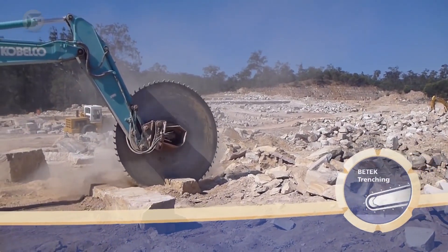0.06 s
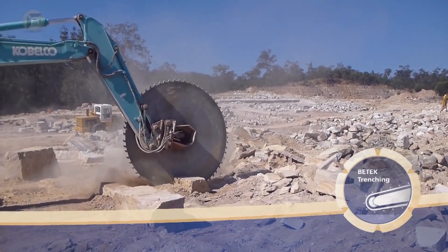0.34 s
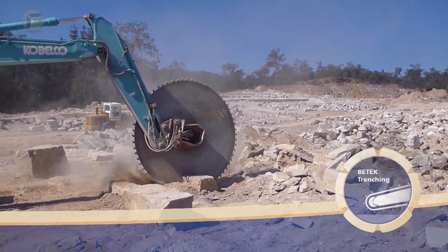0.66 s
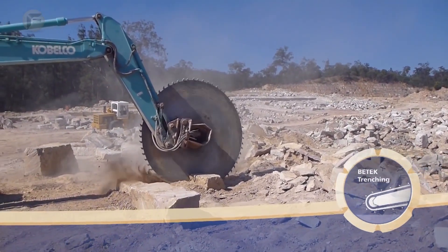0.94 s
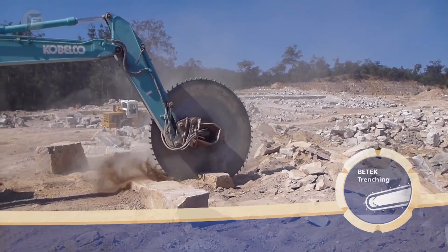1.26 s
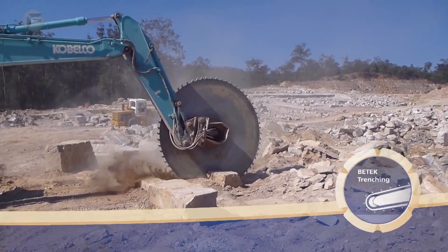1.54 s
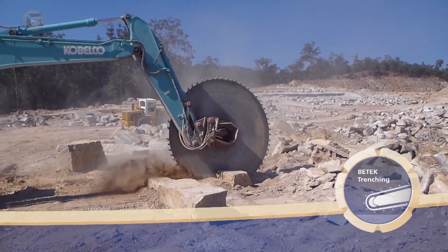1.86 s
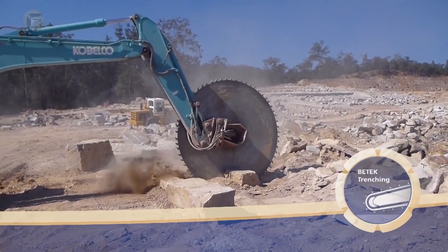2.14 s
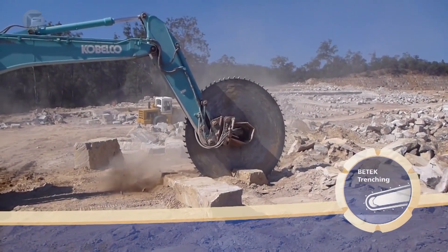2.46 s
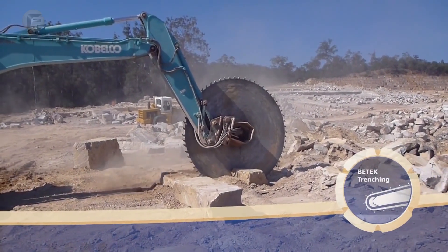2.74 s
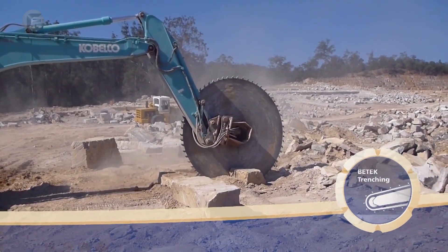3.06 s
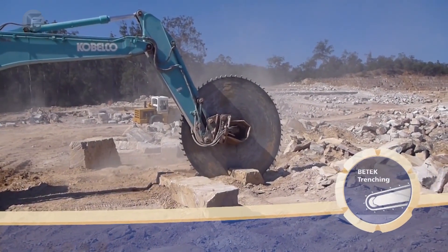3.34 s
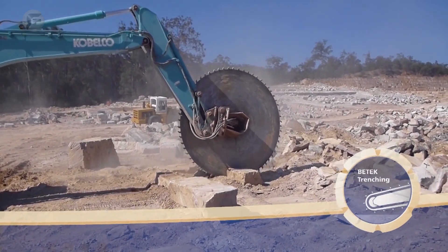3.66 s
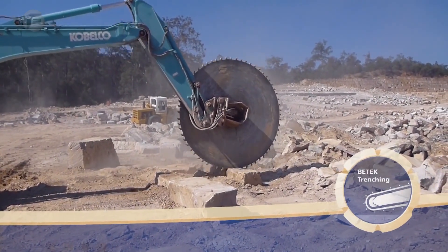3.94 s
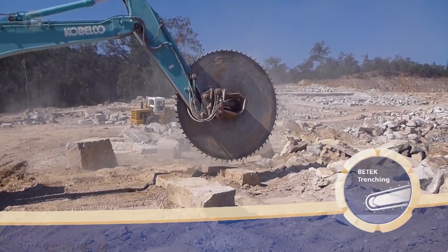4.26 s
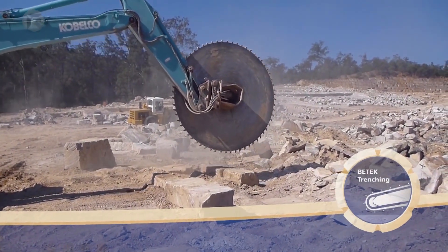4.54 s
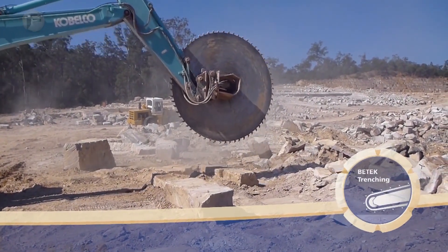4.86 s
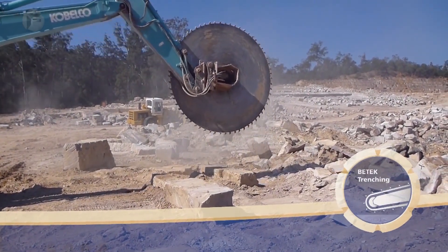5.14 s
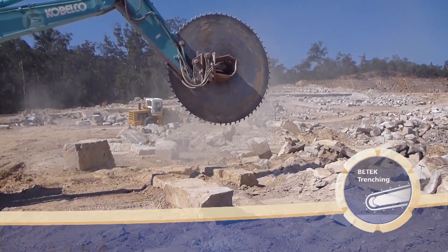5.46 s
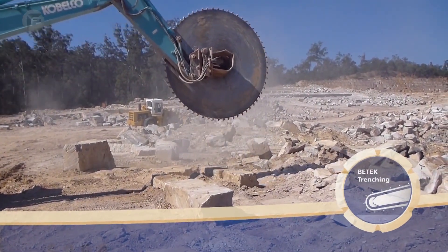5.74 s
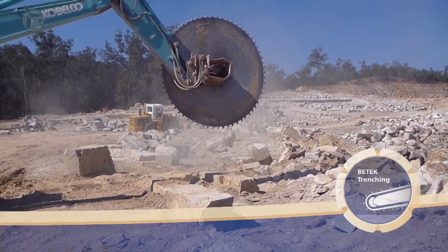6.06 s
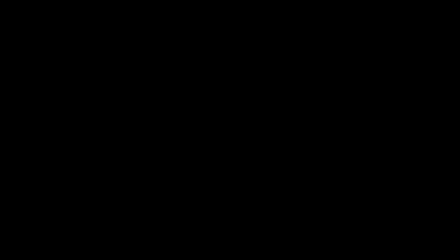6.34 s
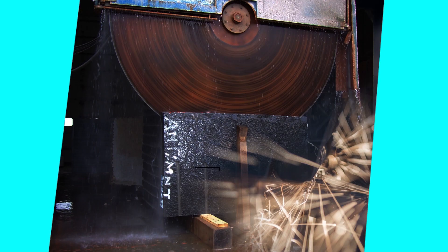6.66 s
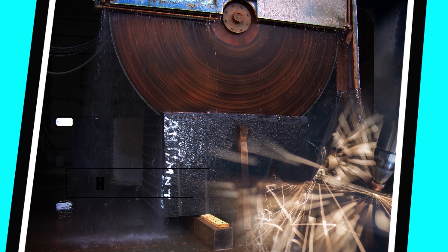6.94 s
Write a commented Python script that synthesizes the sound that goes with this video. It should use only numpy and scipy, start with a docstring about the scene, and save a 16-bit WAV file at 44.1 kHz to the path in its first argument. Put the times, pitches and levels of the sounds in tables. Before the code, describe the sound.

Outdoors in a quarry, a big steel saw wheel crunches through rock, surging as chunks crack off and grit sprays. The grinding soon stops, leaving the excavator's softer diesel clatter and a gently gliding hydraulic whine, while puffs of wind bump the microphone over a low rumble. The machine fades out, and after a short silence comes a brief, faint rush of another saw.

```python
"""An excavator's toothed saw wheel grinds through a stone block in an open quarry, then lifts clear.
Its picks break the stone by brittle fracture, and the cracks excite the resonances of the steel disc.
The diesel and its hydraulic pump remain: they share a shaft, so exhaust note and whine glide together.
Turbulent wind rumbles and thuds on the microphone. The quarry fades out, and after a short silence
the wash of another saw starts at the very end."""
import sys
import numpy as np
from scipy import signal
from scipy.fft import rfft, irfft
from scipy.io import wavfile

SR = 44100
rng = np.random.default_rng(int(sys.argv[2]) if len(sys.argv) > 2 else 0)


def master(y):
    """Save y as 16-bit WAV."""
    cut = np.clip(np.atleast_2d(y).T, -1, 1)
    pcm = np.round(cut * 32767)  # scale
    wavfile.write(sys.argv[1], SR, pcm.astype(np.int16))


N = 309141
T = np.arange(N) / SR
HZ = np.fft.rfftfreq(N, 1 / SR)
EXIT_S, LIFT_S = 2.172, (2.65, 3.87)  # the wheel leaves the block; the boom lifts (from, to)


def amp(db):
    """Decibels as an amplitude ratio."""
    return 10 ** (np.asarray(db) / 20)


def unit(x):
    """Normalisation to rms 1."""
    return x / np.sqrt(np.mean(x ** 2) + 1e-20)


def curve(rows):
    """Linear interpolation of (time_s, value) rows to one value per sample."""
    return np.interp(T, *np.transpose(rows))


def ramp(times, start, end):
    """Linear change between two times."""
    return np.interp(T, times, [start, end])


def swell(s, length):
    """Gaussian envelope centred on the time s."""
    return np.exp(-(2 * (T - s) / length) ** 2)


def shape(points):
    """Spectral envelope: (frequency_hz, level_db) rows as a gain per frequency."""
    hz, db = np.transpose(points)
    return amp(np.interp(np.log(HZ + 1), np.log(hz + 1), db))


def colour(x, gain):
    """Filtering by multiplication of the spectrum."""
    return irfft(rfft(x) * gain, N)


def noise(gain):
    """Filtered Gaussian noise of rms 1."""
    return unit(colour(rng.standard_normal(N), gain))


def band_rms(x, low_hz, high_hz):
    """The rms of x inside one band."""
    return np.std(colour(x, (HZ > low_hz) & (HZ < high_hz))) + 1e-12


def wander(rate_hz):
    """Random modulation: low-pass noise of rms 1."""
    return noise(1 / (1 + (HZ / rate_hz) ** 4))


def grains(per_s, spread_db):
    """Shot noise: random clicks, most small and a few large."""
    size = amp(spread_db * np.minimum(rng.exponential(1, N), 4.5)) * rng.choice([-1, 1], N)
    return unit(size * (rng.random(N) < per_s / SR))


def resonances(rows):
    """Lorentzian peaks added in power to a flat response."""
    return np.sqrt(1 + sum(amp(db) ** 2 / (1 + (2 * (HZ - hz) / width) ** 2) for hz, width, db in rows))


def noise_bands(rows):
    """Band-limited noise bursts: the narrower the band, the clearer the pitch."""
    return sum(amp(db) * swell(s, length) * noise(1 / (1 + (2 * (HZ - hz) / width) ** 4))
               for s, length, hz, width, db in rows)


# steady pressure of the wheel on the stone: time_s, level_db
WHEEL_FEED = [(0, -30.5), (.75, -29.5), (1.03, -30.5), (1.2, -30.5), (1.5, -32), (1.7, -30.5), (1.765, -35),
              (1.82, -31), (1.95, -31), (2.045, -33.5), (2.1, -33.5), (2.135, -35), (2.2, -35.5)]
# a chunk cracks off and the picks bite deeper: start_s, length_s, rise_db, bass_db, crack_db
DEEP_BITES = [(0.031, 0.041, 3, 0.5, -18.5), (0.173, 0.025, 3.5, 1, -19), (0.338, 0.018, 7, 1, -15.5),
              (0.44, 0.079, 1, 1.5, -19.5), (0.556, 0.088, 2, 1, -16), (0.664, 0.04, 2.5, -1, -27.5),
              (0.778, 0.046, 2.5, 0, -19.5), (0.836, 0.022, 3, -0.5, -13.5), (.866, 0.032, 4, 1, -21),
              (0.946, 0.037, 3.5, -3.5, -24), (1.068, 0.061, 4.5, -1.5, -17), (1.276, 0.027, 4, 0.5, -25),
              (1.351, 0.068, 4, 0, -13), (1.543, 0.12, 0.5, 1.5, -20), (1.608, 0.075, 4, 3.5, -30.5),
              (1.663, 0.011, -2, -4.5, -15), (1.788, 0.043, 2.5, 0.5, -13), (1.847, 0.019, 2, 2.5, -17),
              (1.984, 0.015, 1, 1, -18), (2.078, 0.029, 1, 2.5, -34), (2.157, 0.015, -0.5, 5, -18)]
# fine grit spurts or thins: centre_s, length_s, change_db
GRIT_SPURTS = [(0.133, .05, -4.5), (.45, .1, -2), (0.898, .15, 2), (1.215, 0.053, 5), (1.33, 0.063, -5),
               (1.42, 0.11, 2), (1.515, .04, 2.5), (1.587, 0.045, -2.5), (1.95, 0.19, 2), (2.305, .04, 5),
               (2.41, .06, 4)]
def cut_levels(attack_s=0.047, release_s=0.015, exit_db_per_s=39, dust_end_s=1.68, dust_db_per_s=10):
    """Envelopes in dB of the cut, its bass and its grit: a surge at each bite, then exponential decay."""
    surge, bass = np.zeros(N), np.zeros(N)
    for s, length, rise_db, bass_db, _ in DEEP_BITES:
        attack = np.clip((T - s) / attack_s + .5, 0, 1)
        held = attack * np.exp(-np.maximum(T - s - length, 0) / release_s)
        surge += rise_db * held
        bass += bass_db * held
    cut = curve(WHEEL_FEED) + surge - exit_db_per_s * np.maximum(T - EXIT_S, 0)
    thinning = dust_db_per_s * np.maximum(T - dust_end_s, 0)  # the sound dulls as the grit runs out
    spurts = sum(db * swell(s, length) for s, length, db in GRIT_SPURTS)
    return cut, bass + 0.58 * thinning, spurts - 0.48 * surge - thinning


def scatter(x, share=0.12, ring_s=0.012):
    """Scattering from nearby rubble gives each crack a short diffuse tail."""
    decay = np.exp(-2 * np.arange(SR // 10) / SR / ring_s)
    power = abs(signal.fftconvolve(x ** 2, decay / decay.sum())[:N])
    return np.sqrt(1 - share) * x + np.sqrt(share * power) * rng.standard_normal(N)


# resonances of the steel disc: pitch_hz, width_hz, gain_db
DISC_MODES = [(132.6, 6.1, 2.5), (313.7, 10, 15), (365, 16, 5), (429.5, 7.9, 14.5), (495.6, 23, 15),
              (566.5, 18, 9.5), (724.5, 24, 7.5), (817, 20, 7), (903, 22, 1.5), (980, 11, 6),
              (1140, 66, 0.5), (1250, 25, -1), (1400, 26, -9), (1750, 35, 2), (2190, 55, -1),
              (2399, 40, -2.5), (2580, 120, -1), (2730, 70, 5.5), (3018, 70, 4), (3126, 55, 5),
              (3290, 60, 0.5), (3450, 55, 3.5), (3608, 60, 7), (3955, 73, 8), (4210, 120, 2), (4480, 63, 1),
              (4970, 78, -2), (5670, 80, -5), (6200, 99, -7), (7360, 60, -6.5)]
def disc_response(depth_db=5.5, crowded_hz=1500, spacing_hz=28):
    """Modal response of the disc: distinct peaks, and a random ripple where high modes crowd."""
    grid = np.arange(0, SR / 2, spacing_hz)
    ripple = np.interp(HZ, grid, rng.uniform(-0.97, 1, len(grid)))
    return resonances(DISC_MODES) * amp(depth_db * ripple * HZ ** 2 / (HZ ** 2 + crowded_hz ** 2))


# spectrum of breaking stone: frequency_hz, level_db
STONE_SPECTRUM = [(25, -21.5), (55, -6), (200, -5.5), (350, -9), (600, -4.5), (1100, -2), (1500, -3),
                  (1950, -10), (2500, -3.5), (3300, -2.5), (3790, -7), (4300, -8.5), (4800, -12),
                  (7300, -16), (10500, -23), (14800, -39)]
def grinding(pick_hz=51, pick_depth=0.11):
    """Brittle fracture: each pick bursts the stone into a shower of cracks that rings the disc."""
    cut_db, bass_db, grit_db = cut_levels()
    picks = np.cumsum(pick_hz * (1 + 0.41 * wander(30))) / SR
    force = rng.uniform(0, 0.53, N)[picks.astype(int)]
    blows = 1 + pick_depth * force * np.exp(-(picks % 1) / .25)
    cracks = 0.5 * grains(3000, spread_db=1.5) + 0.5 * rng.standard_normal(N)
    drive = scatter(cracks * blows * amp(wander(78)))
    stone = colour(drive, shape(STONE_SPECTRUM) * disc_response())
    # heavy chunks boom in the low band, crushed dust fizzes in the high one
    low, high = 1 / (1 + (HZ / 1550) ** 8), 1 / (1 + (5000 / (HZ + 1)) ** 8)
    middle = colour(stone, 1 - low - high) / band_rms(stone, 1800, 5300)
    bass = colour(stone, low) / band_rms(stone, 310, 2400) * amp(bass_db - 1.72 + wander(45))
    grit = colour(stone, high) / band_rms(stone, 4940, 12000) * amp(grit_db - 7.5 + 0.27 * wander(50))
    return (bass + middle + grit) * amp(cut_db + 0.16 + 0.68 * wander(8.1))


# the pump's hum, strong in the cut and again as the boom lifts: time_s, level_db
HUM_LEVEL = [(0, -37), (.13, -34.5), (.28, -38.5), (.45, -32.5), (.65, -39), (1.2, -46), (2.4, -55),
             (3.42, -55.5), (3.52, -40), (3.61, -37.5), (3.67, -41.5), (3.94, -34.5), (4.04, -42.5),
             (4.11, -36), (4.22, -41.5), (4.35, -30), (4.51, -42), (4.75, -44.5), (4.88, -33.5),
             (5.13, -36), (5.19, -40), (5.32, -34), (5.52, -34.5), (5.68, -37.5), (5.78, -48), (6, -38.5)]
def pump_hum(strokes, throb_depth=0.19):
    """The second harmonic of the piston rate, amplitude-modulated by the engine's two-turn cycle."""
    level = amp(curve(HUM_LEVEL) + 0.5 * wander(13))
    throb = 1 + throb_depth * np.sin(2 * np.pi * strokes / 18 + wander(6.7))
    jolts = ramp((EXIT_S, LIFT_S[0]), 0.5115, 0) * wander(23)  # the picks shake the phase as they cut
    return level * throb * np.sin(2 * np.pi * 2 * strokes + 0.22 * wander(70) + jolts)


# oil flow to the boom: time_s, level_db
OIL_FLOW = [(2.6, -54), (3.05, -60), (3.15, -54), (3.45, -52), (3.57, -48), (4.0, -53.5), (4.15, -51),
            (4.55, -54.5), (4.82, -50), (5.7, -51.5)]
# main partials of the whine: harmonic, level_db
WHINE_PARTIALS = [(4, -3.5), (5, -11.5)]
# its other partials: harmonic, level_db
WHINE_OVERTONES = [(3, -9), (6, -14.5), (7, -13), (8, -11), (9, -14), (10, -14.5), (11, -20), (12, -15),
                   (13, -14), (14, -12), (15, -12), (16, -16), (17, -19), (18, -20.5), (19, -21)]
# resonances of the steel boom: pitch_hz, width_hz, gain_db
BOOM_MODES = [(1284, 98, 11), (1870, 35, 5.5), (2250, 54, 8.5), (2570, 45, 4.5), (3100, 70, 7.5)]
# single partials flare briefly: centre_s, length_s, harmonic, level_db
WHINE_FLARES = [(3.2, .3, 15, -59), (3.31, .25, 12, -58), (3.3, .45, 4, -53), (3.57, .1, 13, -55),
                (3.58, .12, 12, -54), (3.76, .22, 3, -51), (3.82, .2, 8, -60), (3.84, .16, 12, -58),
                (3.8, .2, 16, -63), (4.12, .14, 4, -53), (4.28, .25, 8, -60), (4.62, .3, 15, -64),
                (4.83, .26, 12, -54), (4.9, .2, 16, -63), (4.9, .22, 17, -67), (4.9, .25, 6, -58),
                (4.88, .2, 13, -61), (5.39, .45, 4, -46.5), (5.5, .45, 7, -56), (5.35, .22, 16, -58),
                (5.37, .28, 17, -61), (5.33, .2, 13, -62), (5.33, .25, 18, -66), (5.55, .15, 15, -60),
                (5.98, .3, 8, -61), (6.1, .2, 18, -66)]
def pump_whine(strokes, piston_hz, relax_s=(5.66, 5.78), waver_db=1.5):
    """Forced vibration: the boom's resonances lift each piston harmonic that glides through them."""
    pressure = ramp(relax_s, 0.96, 0.25)  # the valve eases off
    drive = amp(curve(OIL_FLOW)) * ramp(LIFT_S, 0.28, 0.96) * pressure
    steel = resonances(BOOM_MODES)
    partials = list(WHINE_PARTIALS) + [(k, db + 0.5) for k, db in WHINE_OVERTONES]
    sizes = {k: drive * amp(db) * np.interp(k * piston_hz, HZ, steel) for k, db in partials}
    for s, length, k, db in WHINE_FLARES:
        sizes[k] = np.hypot(sizes[k], amp(db) * swell(s, length))
    jitter = 0.2 * wander(16) + 0.12 * wander(70)
    return sum(size * amp(waver_db * wander(16))
               * np.sin(2 * np.pi * (k * strokes + rng.random()) + jitter) for k, size in sizes.items())


# load on the engine: time_s, level_db
ENGINE_LOAD = [(0, -14), (2.4, -10), (3.3, -7), (3.7, -4.5), (4.55, -5.5), (5.1, -0.2), (5.6, 0.5)]
# partials of the exhaust note: shaft_multiple, level_db
EXHAUST_ORDERS = [(3, 1), (4.5, -8.5), (6, -25), (7, -12), (9, -9.5), (10, -10.5), (16, -12)]
# spectrum of the engine's clatter: frequency_hz, level_db
CLATTER_SPECTRUM = [(210, -45.5), (350, -10.5), (419, -15), (525, -2.5), (657, -16.5), (830, -11),
                    (1190, -20), (1320, -14.5), (3000, -34.5), (3900, -63.5), (6600, -120)]
def diesel(turns, firing):
    """Periodic combustion: a low exhaust note and pulsing clatter, both growing with the load."""
    load_db = curve(ENGINE_LOAD)
    exhaust = sum(amp(db + 1.1 * wander(8.3)) * np.sin(2 * np.pi * (k * turns + rng.random()))
                  for k, db in EXHAUST_ORDERS)
    clatter = colour(grains(4000, spread_db=1) * firing, shape(CLATTER_SPECTRUM))
    clatter *= amp(0.75 * load_db - 46.5) / band_rms(clatter, 585, 950)
    return exhaust * amp(load_db - 34) + clatter


# spectrum of flowing oil: frequency_hz, level_db
OIL_SPECTRUM = [(1060, -34), (1570, -10.5), (1730, -10.5), (1840, 1), (1950, -8), (2100, -8), (2650, -6),
                (2860, -12), (3030, -3), (3210, -5), (4130, -12), (5500, -20), (5930, -20), (9500, -31),
                (10500, -29.5), (13400, -42.5)]
def oil_hiss(firing):
    """Flow noise: the hiss follows the oil flow and pulses slightly with each firing."""
    hiss = colour(rng.standard_normal(N) * firing, shape(OIL_SPECTRUM))
    return hiss * amp(curve(OIL_FLOW) - 1) / band_rms(hiss, 1800, 3800)


# strength of the rumble: time_s, level_db
RUMBLE_LEVEL = [(0, -42.5), (.25, -38.5), (.7, -44), (1.5, -40.5), (2.9, -42), (3.12, -41.5), (3.35, -37),
                (3.85, -40.5), (4.42, -34.5), (4.56, -41), (5, -40.5), (5.2, -35), (5.6, -40)]
# its spectrum: frequency_hz, level_db
RUMBLE_SPECTRUM = [(20, -40), (35, -20), (55, -3), (90, -2), (140, 1), (220, 0), (310, -6), (400, -14),
                   (700, -23), (1500, -65)]
def rumble(lumpy_db=1.45):
    """Random pressure fluctuations of wind and machine make a low, lumpy rumble."""
    lumps = unit(colour(grains(2000, spread_db=2), shape(RUMBLE_SPECTRUM)))
    return lumps * amp(curve(RUMBLE_LEVEL) + 1.5 + lumpy_db * wander(38))


def crunches(attack_s=0.0006, decay_s=0.0037):
    """Sudden stress release: at each bite a chunk gives way with a short dull crack."""
    t, hits = np.arange(SR // 20) / SR, np.zeros(N)
    burst = (1 - np.exp(-t / attack_s)) * np.exp(-t / decay_s)
    for s, *_, db in DEEP_BITES:
        hits[round(s * SR) + np.arange(len(t))] += amp(db - 5) * burst
    chunk = [(150, -19.5), (400, -4.5), (900, 3), (1400, -1.5), (2000, -14), (3300, -10),
             (6000, -28), (13000, -52.5)]  # frequency_hz, level_db
    return hits * noise(shape(chunk))


def pings(per_mode_per_s=9, ring_s=0.014, lowest_hz=2000):
    """Impulse response: hard grains strike the rim and ring single high modes of the disc."""
    t, rings = np.arange(SR // 12) / SR, np.zeros(N)
    for hz, _, db in DISC_MODES:
        if hz > lowest_hz:
            mode = np.exp(-t / ring_s) * np.sin(2 * np.pi * hz * t)
            rings += amp(db) * signal.fftconvolve(grains(per_mode_per_s, spread_db=1.5), mode)[:N]
    return unit(rings) * amp(cut_levels()[0] - 11)


# picks that skid: centre_s, length_s, pitch_hz, width_hz, level_db
PICK_SKIDS = [(0.175, 0.02, 7000, 1398, -35.5), (.25, 0.041, 10870, 1097, -48),
              (.352, .028, 3000, 1400, -27.5), (.885, .012, 3400, 1500, -26.5),
              (.38, .07, 10400, 401.6, -45), (0.457, 0.11, 510, 24.74, -31), (0.629, .05, 5660, 398, -46),
              (.874, 0.022, 722, 250, -25.5), (1.296, 0.036, 3700, 700, -30),
              (1.815, 0.035, 9000, 5000, -38.5), (2.16, 0.05, 800, 69.7, -34),
              (2.195, .04, 3300, 1000, -38), (2.38, .08, 3300, 1010, -45.5),
              (2.535, .05, 3200, 1200, -47.5), (2.615, 0.035, 3400, 1000, -53), (2.56, .1, 11700, 200, -75),
              (2.815, 0.05, 6200, 500, -64)]
def skids():
    """Friction: a skidding pick rings briefly in one band."""
    return noise_bands(PICK_SKIDS)


# puffs on the microphone: start_s, level_db, pitch_hz, ring_s
WIND_PUFFS = [(1.102, -22, 151, 0.01), (1.751, -20.5, 138, 0.0045), (1.998, -25.5, 98, 0.014),
              (2.329, -26, 110, 0.0073), (2.437, -26, 96, 0.01), (2.757, -20.5, 230, 0.0031),
              (2.7616, -22, 420, 0.0033), (2.783, -24, 136, 0.008), (2.799, -27, 260, 0.005),
              (2.812, -28, 130, .005), (2.839, -25, 150, 0.0056), (3.018, -21.5, 115, 0.0071),
              (3.028, -16.5, 200, 0.0031), (3.045, -26, 157, .006), (3.16, -19.5, 167, 0.0071),
              (3.249, -22.5, 210, 0.0044), (3.267, -22.5, 170, 0.0045), (3.321, -25, 120, 0.008),
              (3.36, -20.5, 128, 0.0057), (3.392, -25.5, 200, .005), (3.451, -23, 106, 0.009),
              (3.512, -22, 220, .004), (3.537, -24, 190, 0.0042), (3.6, -22, 120, 0.0057),
              (3.688, -20.5, 120, 0.0048), (3.782, -25, 200, 0.0035), (3.921, -21.5, 231, 0.0057),
              (3.938, -21, 150, 0.006), (4.064, -21.5, 227, 0.0048), (4.089, -21.5, 110, 0.0079),
              (4.127, -23, 150, 0.0065), (4.142, -17, 165, 0.0042), (4.212, -25, 190, 0.004),
              (4.281, -25, 150, 0.0052), (4.307, -24, 214, 0.0038), (4.346, -23, 150.1, 0.0095),
              (4.413, -21, 175, 0.0065), (4.428, -20, 190, 0.0031), (4.438, -25, 280, .004),
              (4.474, -15, 130, 0.0078), (4.482, -19, 121, 0.004), (5.131, -27, 89.7, 0.0058),
              (5.173, -19.5, 99.3, 0.0053)]
def wind_thuds(slap=0.6, rush=0.13, rush_hz=620, band_hz=(72, 3000)):
    """Damped oscillation: each puff slaps the microphone's diaphragm and lets it swing."""
    air = noise(1 / (1 + (HZ / rush_hz) ** 4) * HZ / (HZ + 90))
    t, thuds = np.arange(SR // 16) / SR, np.zeros(N)
    for s, db, hz, ring in WIND_PUFFS:
        at = round(s * SR) + np.arange(len(t))
        push = (1 - np.exp(-t / 0.00053)) * np.exp(-t / ring)
        # quicker puffs have a sharper front and are more turbulent
        front = slap * np.exp(-.5 * ((t - .002) * hz / 0.12) ** 2)
        turbulence = rush * hz / 140 * air[at]
        swing = push / push.max() * (np.sin(2 * np.pi * hz * t) + turbulence)
        thuds[at] += amp(db - 0.5) * (front + swing)
    return signal.sosfilt(signal.butter(2, band_hz, "bandpass", fs=SR, output="sos"), thuds)


# longer eddies: centre_s, length_s, level_db
WIND_EDDIES = [(2.787, 0.074, -37), (3.033, .03, -35), (3.257, 0.051, -34), (3.33, .03, -37),
               (3.411, .015, -34), (3.475, .025, -34.5), (3.618, .04, -37.5), (3.933, 0.022, -32),
               (4.22, .04, -36), (4.35, 0.058, -39), (4.424, .035, -33)]
def buffeting():
    """Turbulence: eddies flutter roughly over the microphone."""
    eddy = [(30, -25), (100, 7), (200, -1.5), (330, 4), (550, -7.5), (900, -15),
            (2000, -50), (6000, -105)]  # frequency_hz, level_db
    return sum(amp(db) * swell(s, length) for s, length, db in WIND_EDDIES) * noise(shape(eddy))


# oil whistling in the valve: centre_s, length_s, pitch_hz, width_hz, level_db
VALVE_WHISTLES = [(3.29, .08, 3350, 50, -58), (3.3, 0.33, 3700, 350, -60), (3.3, 0.24, 1340, 45, -52.5),
                  (3.57, .11, 3130, 200, -54), (4.199, .2, 2630, 150, -56), (4.3, .4, 1830, 80, -59.5),
                  (5.93, 0.24, 1327, 25, -46)]
def valve_whistles():
    """Throttled flow: oil squeezed through the valve sings in narrow bands."""
    return noise_bands(VALVE_WHISTLES)


# grit leaving the wheel: centre_s, length_s, level_db
GRIT_SPRAYS = [(3.615, .2, -66), (4.135, 0.15, -48), (5.653, 0.077, -52)]
def swishes():
    """Broadband noise of many particles: brief sprays of grit leave the spinning rim."""
    spray = [(800, -22), (2500, 6), (4000, 3.5), (6000, -14),
             (10000, -18), (14000, -32)]  # frequency_hz, level_db
    return sum(amp(db) * swell(s, length) for s, length, db in GRIT_SPRAYS) * noise(shape(spray))


# spectrum of a distant saw: frequency_hz, level_db
FAR_SAW_SPECTRUM = [(25, -22), (50, 5), (89, 0), (150, -14), (230, -6), (290, 3.5), (370, -7.5), (600, -17),
                    (1150, -14.5), (1600, -19), (3000, -24.5), (6600, -30), (9000, -44), (13000, -61)]
def far_saw(level_db=-47, onset_s=(6.932, 6.952)):
    """Stationary noise, strongest in the bass: the wash of another saw sets in."""
    return amp(level_db) * noise(shape(FAR_SAW_SPECTRUM)) * ramp(onset_s, 0, 1) ** 2


# piston rate of the pump: time_s, rate_hz
PISTON_RATE = [(0, 276), (.25, 282.6), (2.95, 282), (3.1, 282.6), (3.2, 277.3), (3.42, 274.5), (3.5, 268.4),
               (3.6, 254.8), (3.72, 250.2), (3.8, 252.6), (3.9, 258.3), (4.05, 262.4), (4.33, 258.3),
               (4.63, 263.8), (4.93, 259.3), (5.32, 267.3), (5.57, 265.1), (5.68, 269.2), (5.82, 276.7),
               (6.15, 273)]
def scene(fade_s=(5.684, 6.18)):
    """Superposition of all sources, alike in both channels; one shaft locks pump and engine in step."""
    piston_hz = curve(PISTON_RATE)
    strokes = np.cumsum(piston_hz * (1 + .0015 * wander(41.4))) / SR
    turns = strokes / 9  # nine strokes to a turn of the shaft
    firing = 1 + 0.05 * np.cos(2 * np.pi * 3 * turns)  # six cylinders fire three times a turn
    quarry = grinding() + crunches() + pings() + skids()
    quarry += valve_whistles() + np.sqrt(2) * (pump_hum(strokes) + pump_whine(strokes, piston_hz))
    quarry += diesel(turns, firing) + oil_hiss(firing) + swishes()
    quarry += rumble() + wind_thuds() + buffeting()
    mono = quarry * ramp(fade_s, 0.96, 0) + far_saw()
    return np.array([mono, mono])


# narrow dips in the spectrum: centre_hz, width_hz
SPECTRAL_NOTCHES = [(2895, 190), (7850, 50), (11700, 630)]
def record(dry, edge_hz=14800):
    """Linear filtering: three narrow notches colour the sound and a low-pass limits its band."""
    for hz, width in SPECTRAL_NOTCHES:
        dry = signal.lfilter(*signal.iirnotch(hz, hz / width, fs=SR), dry)
    low_pass = signal.firwin(511, edge_hz, window=("kaiser", 9), fs=SR)
    return signal.oaconvolve(dry, low_pass[None], "same")


dry = scene()
out = record(dry)
master(out)
```